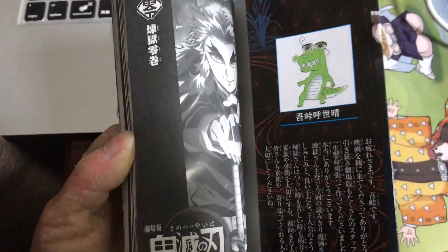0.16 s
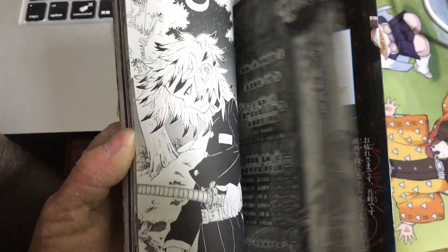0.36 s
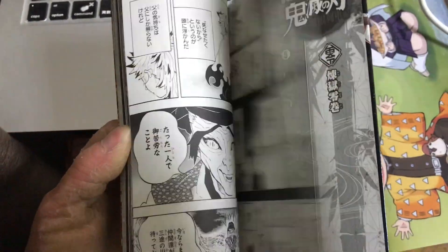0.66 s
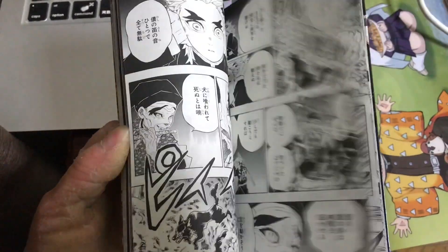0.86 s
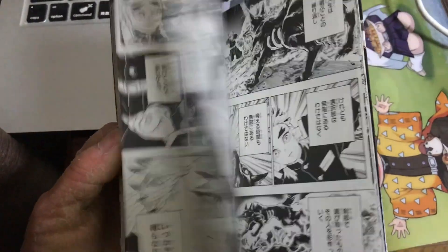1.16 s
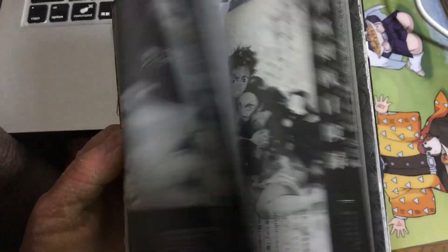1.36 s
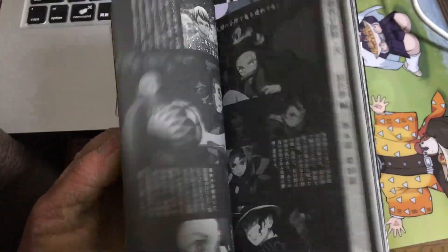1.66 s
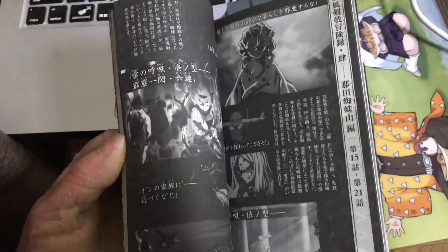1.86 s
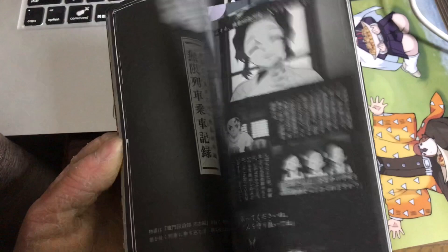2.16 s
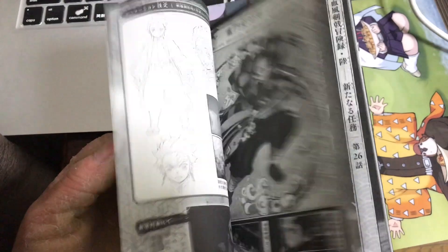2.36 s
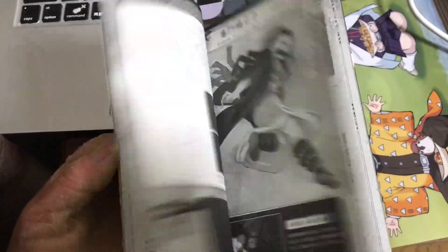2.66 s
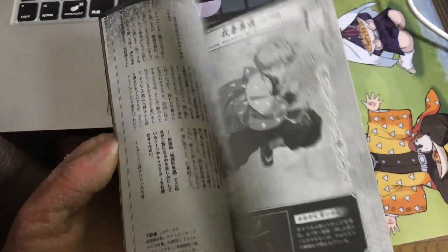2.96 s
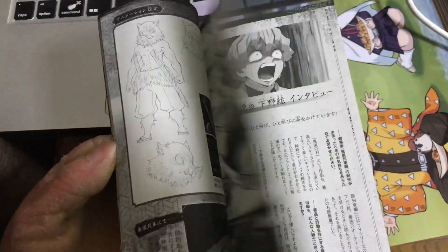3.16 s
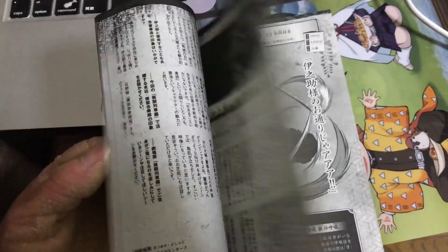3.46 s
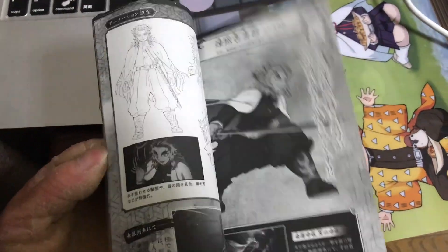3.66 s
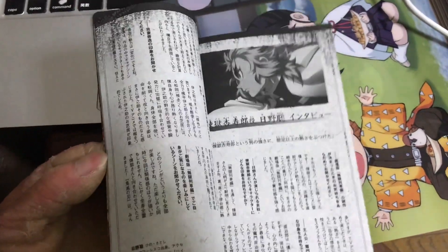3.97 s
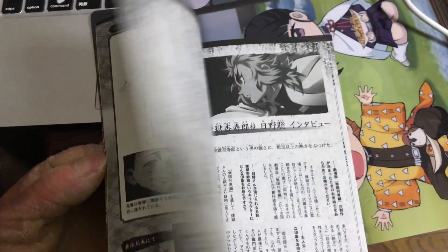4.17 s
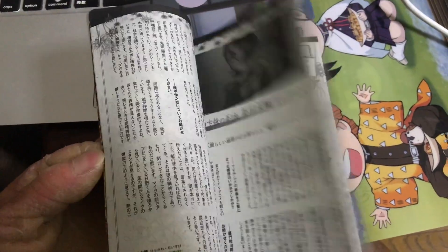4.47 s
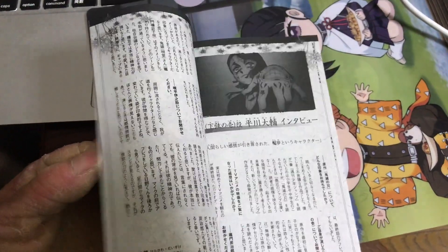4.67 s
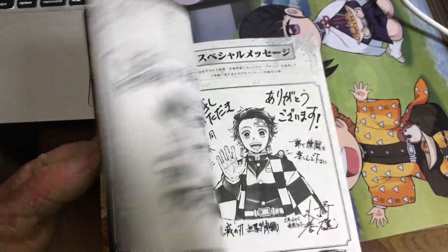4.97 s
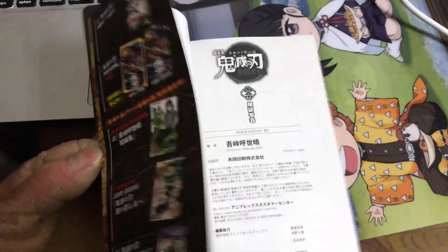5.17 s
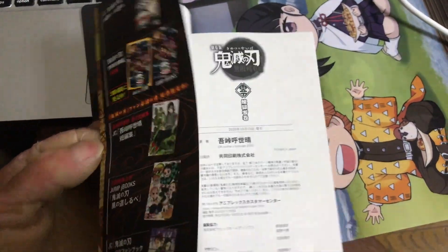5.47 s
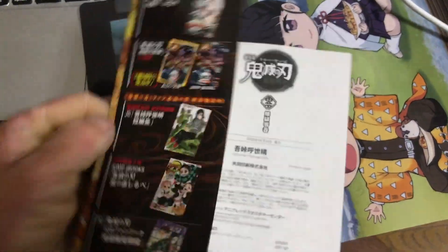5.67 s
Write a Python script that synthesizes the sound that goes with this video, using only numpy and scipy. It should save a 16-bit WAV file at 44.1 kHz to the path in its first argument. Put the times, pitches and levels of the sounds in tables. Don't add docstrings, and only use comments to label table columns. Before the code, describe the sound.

A thumb flips a thin booklet's pages in light, dry ticks and rustles; finally one loud papery slap hits the desk and bounces.

```python
import sys
import numpy as np
from scipy import signal
from scipy.fft import rfft, irfft, next_fast_len
from scipy.io import wavfile
from scipy.ndimage import uniform_filter1d, map_coordinates

SR = 44100
rng = np.random.default_rng(int(sys.argv[2]) if len(sys.argv) > 2 else 0)


def voltage_ratio(level):
    return 10 ** (np.asarray(level, float) / 20)


def pcm_store(signal):
    levels = np.round(np.clip(np.atleast_2d(signal), -1, 1) * 32767)
    wavfile.write(sys.argv[1], SR, levels.astype(np.int16).T)


N = 256662


def unit(x):
    return x / np.sqrt(np.mean(x ** 2, axis=-1, keepdims=True) + 1e-20)


def along(points, hz):
    f, v = np.transpose(points)
    return np.interp(np.log(hz + 1), np.log(f + 1), v)


def wobble(rate_hz):
    knots = rng.standard_normal(int(N * rate_hz / SR) + 4)
    return map_coordinates(knots, [np.arange(N) * rate_hz / SR])


def resonance(f, hz, t60_s):
    loss = np.log(1000) / t60_s
    return 2 * np.pi * hz / SR / ((loss + 2j * np.pi * f) ** 2 + (2 * np.pi * hz) ** 2) * SR ** 2


def dying(t60_at, shape):
    hz, t, z = signal.stft(rng.standard_normal(shape), SR, nperseg=128)
    decay = voltage_ratio(-60 * t / along(t60_at, hz)[:, None])
    tail = signal.istft(z * decay, SR, nperseg=128)[1][..., :shape[-1]]
    return tail / np.linalg.norm(tail, axis=-1, keepdims=True)


def laid(rows, times_s, lead):
    at = np.round(np.asarray(times_s) * SR).astype(int)[:, None] - lead + np.arange(rows.shape[1])
    inside = (at >= 0) & (at < N)
    return np.bincount(at[inside], rows[inside], N)


def pages():
    # frequency in Hz, level in dB.
    inner_body = [(300, -20), (700, -15), (1100, -0.5), (1400, 11), (1800, -7), (2600, 0), (3400, -1),
                  (5000, -59)]
    # frequency in Hz, level in dB.
    cover_body = [(900, -48), (1500, -43), (1800, 2), (2200, 8), (2900, 6.5), (3600, 1), (5000, -17)]
    # frequency in Hz, t60 in seconds.
    hollow = [(300, .05), (1500, .045), (6000, .03), (15000, .02)]
    # peak in seconds, level in dB, build-up in ms, let-go in ms.
    swishes = [
        (0.363, -57, 0.6, 2.2),
        (0.3767, -43.5, 4.4, 3.8),
        (0.393, -45, 12.5, 23),
        (0.407, -54, 4.8, 5.8),
        (0.445, -58.5, 21, 18),
        (5.035, -57, 17, 3),
        (5.042, -42, 5, 6.8),
        (5.058, -38, 10.5, 9.6),
        (5.0745, -37, 13, 3.2),
        (5.081, -62, 1.4, 10),
    ]
    covers = [(*row, -9, -2) for row in swishes]
    direct = scrape(slips(), inner_body, rough_db=3.0, ripple_db=0.5, puff_db=-9.5, ring=True)
    direct = direct + scrape(covers, cover_body, rough_db=2.0, ripple_db=1.6, puff_db=-29, ring=False)
    return direct + voltage_ratio(-15.0) * signal.fftconvolve(direct, dying(hollow, (SR // 10,)))[:N]


def slips():
    # release in seconds, level in dB, build-up in ms, looseness in dB.
    riffle = [(0.2462, -43.5, 7, 4), (0.635, -44.5, 4.7, 7), (0.6498, -44.5, 10.5, -12),
              (0.9642, -53.5, 2.4, -1), (0.9772, -42, 0.62, 10), (0.9831, -41.5, 2.9, 2),
              (1.176, -48, 1, 3), (1.181, -45, 9.7, -2), (1.2563, -43.5, 4.2, -8), (1.3742, -45, 0.94, 0),
              (1.4106, -40.5, 2, -6), (1.428, -53, 14, -3), (1.4302, -39.5, 1.1, -6),
              (1.576, -45.5, 8.3, -4), (1.7359, -48, 8.7, -2), (2.0627, -48.5, 6.5, 1),
              (2.103, -50, 10, -9), (2.1618, -45, 3.4, 1)]
    # release in seconds, level in dB, build-up in ms, drag level in dB, looseness in dB.
    singles = [(2.2694, -48, 2.5, -64, -5), (2.4289, -45.5, 3, -70, 6), (2.5635, -44, 2, -56, 8.5),
               (2.6943, -47, 2.6, -72, -3), (2.8319, -40, 1.3, -76, -1.5), (2.9294, -55.5, 0.6, -62, -4),
               (2.9449, -47, 2.8, -60, -1.5), (3.1276, -44, 2.1, -79, 3.5), (3.39, -53.5, 8.7, -72, 0),
               (3.5423, -50.5, 3.7, -65, 3), (3.749, -48, 1, -70, 7), (4.147, -53, 2.4, -80, -7),
               (4.155, -46.5, 1.2, -77, -2), (4.355, -55, 1.1, -70, 3), (4.366, -47, 0.8, -75, -5),
               (4.7418, -49.5, 1.7, -59.5, 4), (5.006, -53, 4, -61, -8)]
    # peak in seconds, level in dB, half length in ms, sheet body in dB, edge brightness in dB.
    rubs = [(0.6251, -45, 3.8, 1.5, -3), (0.756, -43.5, 3.6, 0, 4.5), (0.768, -46, 4.5, -2, -6),
            (0.806, -49, 3.7, 3, 3.5), (1.16, -47.5, 4.8, -0.5, -3), (1.2244, -52.5, 6.1, 6, 3),
            (1.2952, -48, 3.7, 5.5, 5), (1.353, -49, 2.8, 7, 10.5), (1.372, -54, 12, -1.5, -24),
            (1.399, -56, 2.5, -9, -32), (1.453, -62, 7, -2, -27), (1.5579, -42, 2.5, -5.5, -1),
            (1.7129, -48.5, 5.4, -0.5, -1.5), (2.034, -71.5, 10, 8, -9), (2.0749, -49.5, 9.3, -0.5, -21),
            (2.133, -60, 7.5, 2.5, -13), (2.2491, -60, 3.7, -3, -5.5), (2.6715, -62.5, 6.1, 1.5, -2),
            (2.792, -62.5, 8, -6, -3), (3.704, -62, 6.1, -15, -9), (4.323, -70, 13, -15, 3),
            (4.984, -62, 6.7, 4, 6)]
    # peak in seconds, level in dB.
    crinkles = [(0.198, -72), (0.716, -69), (0.9085, -70), (1.3375, -63), (1.567, -50), (2.111, -70),
                (2.477, -63), (2.535, -60.5), (2.647, -68), (3.106, -62), (4.497, -67), (4.963, -66),
                (5.502, -65), (5.736, -64)]
    # peak in seconds, level in dB, build-up in ms, let-go in ms.
    creaks = [
        (0.048, -56, 4.3, 13),
        (5.542, -72, 5, 25),
        (5.596, -74, 36, 100),
        (5.65, -53, 0.6, 2.8),
        (5.666, -55, 2.4, 2.2),
        (5.684, -52.5, 13.4, 1.9),
        (5.774, -59, 1, 1.9),
        (5.8, -64, 20, 25),
    ]

    def let_go_ms(build_up_ms):
        return 1.24 * abs(build_up_ms) ** -0.43

    def tone(loose_db):
        return -3 + 0.4 * loose_db, loose_db

    events = [(s, db, ms, let_go_ms(ms), *tone(loose_db)) for s, db, ms, loose_db in riffle]
    for s, db, ms, drag_db, loose_db in singles:
        events.append((s, db, ms, let_go_ms(ms), *tone(loose_db)))
        events.append((s, drag_db, 14.5, 1.1, *tone(-4)))
    events += [(s, db, 1.4, 2.8, *tone(-4.5)) for s, db in crinkles]
    events += [(s, db, ms, ms, body_db, bright_db) for s, db, ms, body_db, bright_db in rubs]
    return events + [(*row, 3, -5) for row in creaks]


def scrape(events, body, rough_db, ripple_db, puff_db, ring, size=16384):
    # frequency in Hz, level in dB.
    edge = [(1500, -18), (2500, -17), (3800, 5), (6000, 3), (8000, -9.5), (10000, -10), (13000, -25)]
    # frequency in Hz, level in dB.
    treble = [(5000, -38), (7500, -0.5), (9000, 2.5), (10500, -1.5), (12500, -4), (15000, -2), (17000, -38)]
    stiffens_per_s = 0.023
    s, db, rise_ms, fall_ms, body_db, bright_db = np.transpose(events)[:, :, None]
    fall_ms = np.abs(fall_ms)
    shape = (len(s), size)
    ms = (np.arange(size) - size // 2) * 1000 / SR
    swell = np.exp(-np.where(ms < 0, -ms / np.abs(rise_ms), ms / fall_ms) ** 1.24)
    clumps = unit(uniform_filter1d(rng.standard_normal(shape), size=24, axis=1))
    spikes = np.minimum(rng.exponential(size=shape), 5)
    grains = unit(rng.standard_normal(shape) * voltage_ratio(rough_db * (clumps + spikes)))
    grains[:, size // 2 - 8] += 6.5 * np.exp(-fall_ms[:, 0] / 1.5)

    hz = np.fft.rfftfreq(size, 1 / SR)
    uneven = uniform_filter1d(rng.standard_normal((len(s), len(hz))), size=260, axis=1)
    ripple = voltage_ratio(ripple_db * unit(uneven))
    upper = voltage_ratio(along(edge, hz / (1 + stiffens_per_s * s))) + voltage_ratio(bright_db - 5.0 + along(treble, hz))
    lag = np.exp(-2j * np.pi * hz * .0012)
    sheet = lag * voltage_ratio(along(body, hz)) + ring * voltage_ratio(-29) * resonance(hz, 1400, .022)
    colour = ripple * (upper + voltage_ratio(body_db + 2.5) * sheet)
    colour = colour / np.sqrt(np.mean(upper ** 2, axis=1, keepdims=True))
    scraping = irfft(rfft(grains * swell) * colour, size)

    push = voltage_ratio(puff_db) * rng.uniform(0.064, 1, (len(s), 1)) * np.exp(-fall_ms / 2.8)
    puff = push * signal.gausspulse((ms - 5) / 1000, 120, 1.2)
    flap_size = voltage_ratio(puff_db + 8.0 + 1.3 * s) * np.exp(-fall_ms / 1.4)
    flap = flap_size * signal.gausspulse((ms - 1.5) / 1000, 1500, 1.3)
    return laid(voltage_ratio(db) * (scraping + puff + flap), s[:, 0], size // 2)


def blows(size=16384):
    # start in seconds, desk boom in dB, booklet knock in dB,
    # paper clap in dB, clap frequency in Hz.
    strikes = [(1.503, -78, -59, -47, 2100), (2.466, -77, -50.5, -66, 1000), (4.497, -69, -64, -45, 1790),
               (5.1795, -70, -49, -60, 1900), (5.182, -53.5, -44, -47.5, 970), (5.196, -55, -46, -60, 1840),
               (5.228, -61, -65, -70, 900), (5.683, -57, -42, -60, 1300), (5.6888, -27.5, -12, -16, 3000),
               (5.6909, -38.5, -35, -16.5, 2830), (5.705, -37, -40, -51, 1500),
               (5.7113, -62, -36, -59, 1500), (5.764, -47.5, -30.5, -21.5, 3520),
               (5.774, -63, -44, -52, 2500), (5.813, -49, -47.5, -79, 885)]
    # frequency in Hz, level in dB, t60 in seconds.
    desk_modes = [(75.5, -8, 0.048), (121, -10, 0.076), (191, -4, 0.068), (262, -7.5, 0.1),
                  (339.4, -6.5, 0.17), (478, -3, 0.058), (648, -8, 0.064)]
    # frequency in Hz, level in dB, t60 in seconds.
    booklet_modes = [(845, -4.5, 0.026), (1122, 1.5, 0.011), (1366, -12, 0.045), (1496, -13.5, 0.041),
                     (1750, -6, 0.011), (2080, -16.5, 0.021)]
    # frequency in Hz, level in dB, t60 in seconds.
    loose_leaves = [(149, -13, 0.2), (334, -7, 0.064), (1100, -10, 0.063), (2180, -17, 0.06),
                    (5000, -14.5, 0.027), (9400, -25, 0.025), (16000, -51, 0.049)]
    s, boom_db, knock_db, clap_db, clap_hz = np.transpose(strikes)[:, :, None]
    shape = (len(s), size)
    n = np.arange(size)
    hz = np.fft.rfftfreq(size, 1 / SR)

    def ringing(modes):
        total = 0
        for k, (mode_hz, db, t60_s) in enumerate(modes):
            level = voltage_ratio(db + rng.normal(0, 1.06, s.shape))
            total = total + (-1) ** k * level * resonance(hz, mode_hz, t60_s)
        return total

    burst = rng.standard_normal(shape) * np.exp(-n / 70)
    crack = voltage_ratio(-6.5) * rfft(burst) * 1j * hz / 3000 / (1 + 1j * hz / 4500) ** 4
    clap = resonance(hz, clap_hz, .0045) + crack
    sound = voltage_ratio(boom_db) * ringing(desk_modes) + voltage_ratio(knock_db) * ringing(booklet_modes)
    sound = sound + voltage_ratio(clap_db) * clap

    rattle_db = -2.5 + 1.09 * knock_db
    leaf_hz, leaf_db, leaf_t60_s = np.transpose(loose_leaves)
    tail = dying(np.transpose([leaf_hz, leaf_t60_s]), shape)
    rattle = rfft(tail) * voltage_ratio(along(np.transpose([leaf_hz, leaf_db]), hz) + 29.5)
    uneven = voltage_ratio(4.5 * unit(uniform_filter1d(rng.standard_normal(shape), size=130, axis=1)))
    shaking = irfft(voltage_ratio(rattle_db) * rattle, size) * uneven * (1 - np.exp(-n / 40))
    return laid(irfft(sound, size) + shaking, s[:, 0], 0)


def room(x):
    # frequency in Hz, t60 in seconds.
    reverb = [(100, .35), (500, .33), (2000, .33), (6000, .33), (14000, .22)]
    out, step = np.zeros(N + SR), SR // 4
    for start in range(0, N, step):
        answer = signal.fftconvolve(x[start:start + step], dying(reverb, (SR // 3,)))
        out[start + 100:][:len(answer)] += answer
    return out[:N]


def background():
    # frequency in Hz, density in dB per Hz.
    floor = [(15, -51), (25, -36), (37, -29), (55, 1.5), (87, -7.5), (220, -15.5), (245, -16), (280, -13),
             (510, -16.5), (809, -15), (2750, -28.5), (2980, -20), (3510, -31.5), (15200, -46.5),
             (16500, -33)]
    # centre in Hz, width in Hz, gain in dB.
    case = [(215.3, 18, 8), (667, 70, 2.5), (2400, 440, 5.5), (3000, 690, -3), (3870, 1100, 6.5),
            (4570, 320, 2.5), (4900, 250, -5), (6100, 990, 6), (14300, 1200, 0.5)]
    # frequency in Hz, level in dB.
    mains = (59.3, -68.5)
    # frequency in Hz, level in dB.
    motor_lines = [(2918, -75.5), (3138, -81.5), (3354, -85), (5932, -91.5)]
    # time in seconds, gain in dB.
    load = [(0, -5.5), (1.5, -4), (3, -1.5), (4.5, -1), (5.82, -0.5)]
    m = next_fast_len(N)
    hz = np.fft.rfftfreq(m, 1 / SR)
    humps_db = sum(db / (1 + (2 * (hz - centre_hz) / width_hz) ** 2) for centre_hz, width_hz, db in case)
    colour = voltage_ratio(along(floor, hz) + humps_db) * (hz < 15800)
    hush = unit(irfft(rfft(rng.standard_normal(m)) * colour, m)[:N])
    hush = voltage_ratio(-63.5 + 0.9 * wobble(1.22)) * hush

    t = np.arange(N) / SR
    hum_hz, hum_db = mains
    hum = voltage_ratio(hum_db + 3.5 + 1.2 * wobble(5.4)) * np.sin(2 * np.pi * hum_hz * t + .5 * wobble(9.9))
    whine = np.zeros(N)
    for line_hz, db in motor_lines:
        level = voltage_ratio(db + 2.5 + 1.1 * wobble(27))
        whine += level * np.sin(2 * np.pi * line_hz * t + 0.49 * wobble(2.9))
    return hush + hum + voltage_ratio(np.interp(t, *np.transpose(load))) * whine


def scene():
    paper, desk = pages(), blows()
    return (paper + desk + room(voltage_ratio(-27.5) * paper + voltage_ratio(-23.0) * desk) + background())[None]


def roll_off(x):
    return signal.sosfilt(signal.butter(12, 16650, fs=SR, output="sos"), x)


def record(dry):
    # frequency in Hz, gain in dB.
    microphone = [(25, -14), (40, -1.5), (55, -0.5), (9300, 0.5), (10400, -2.5), (11600, 2.5), (15700, 2),
                  (16100, -10), (16500, -27), (16700, -60)]
    response = voltage_ratio(along(microphone, np.fft.rfftfreq(N, 1 / SR)))
    return roll_off(irfft(rfft(dry) * response, N))


dry = scene()
out = record(dry)
pcm_store(out)
```